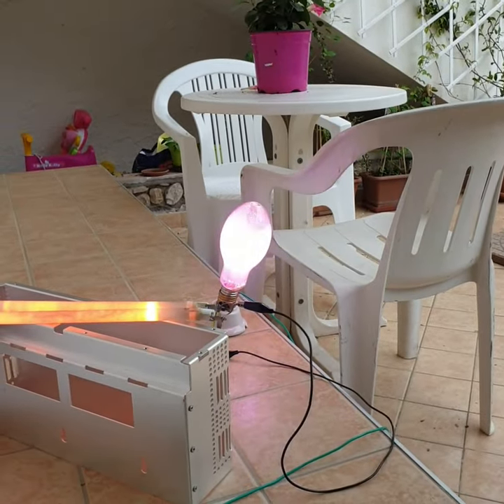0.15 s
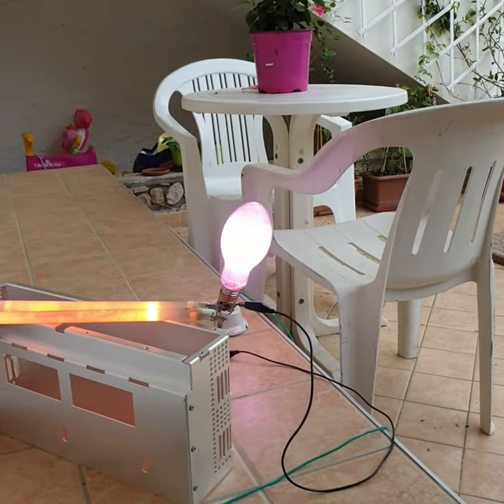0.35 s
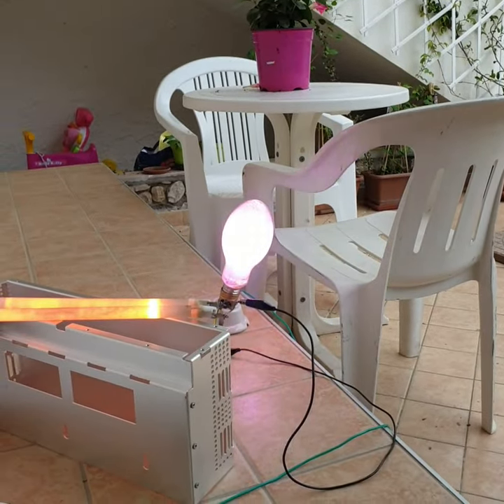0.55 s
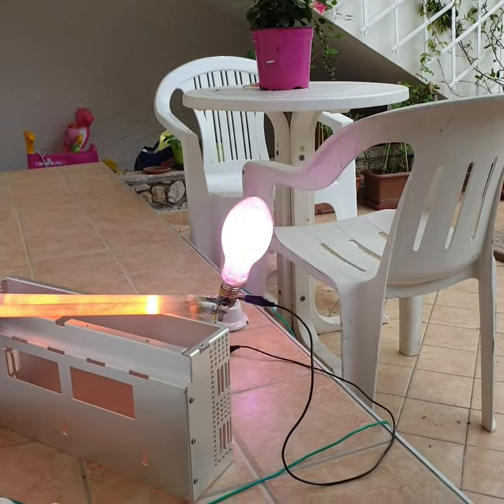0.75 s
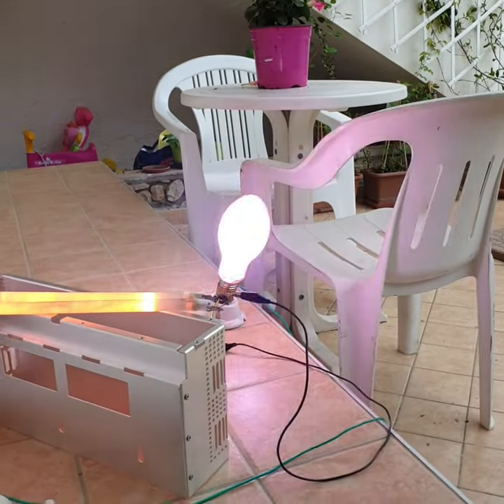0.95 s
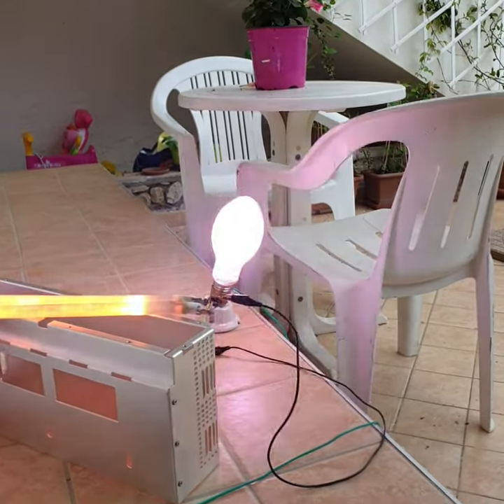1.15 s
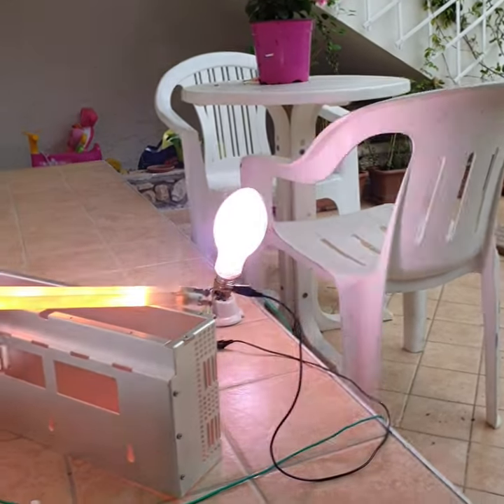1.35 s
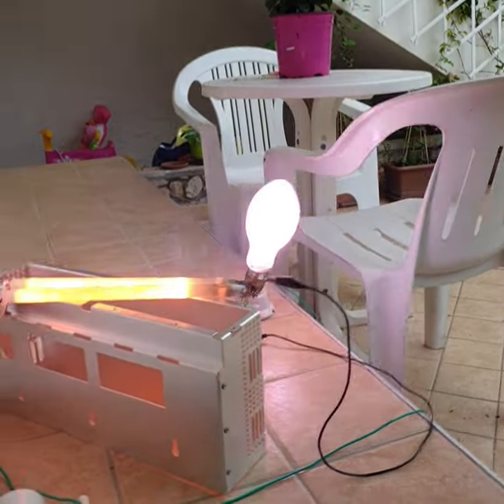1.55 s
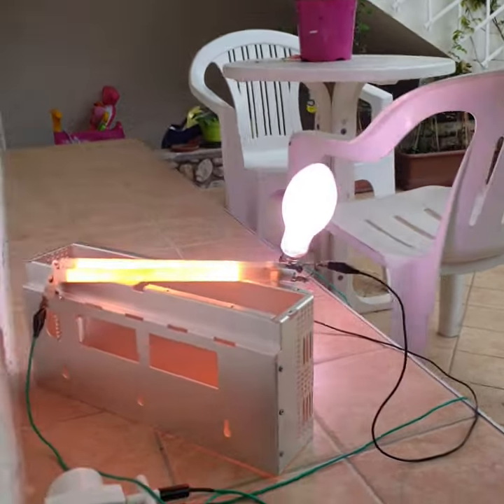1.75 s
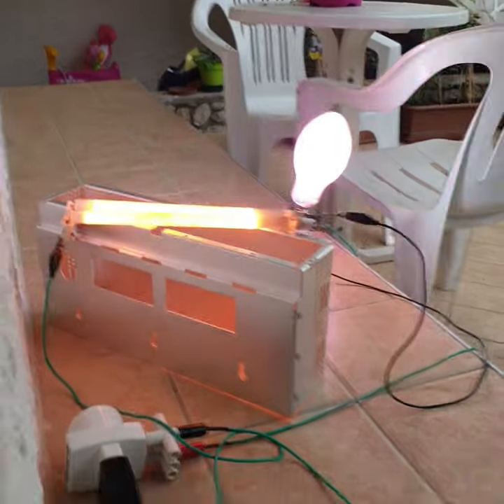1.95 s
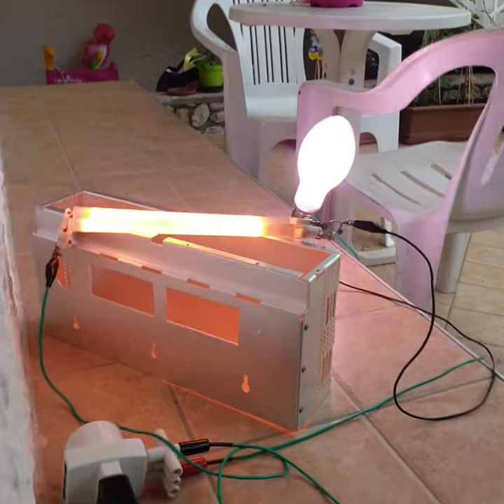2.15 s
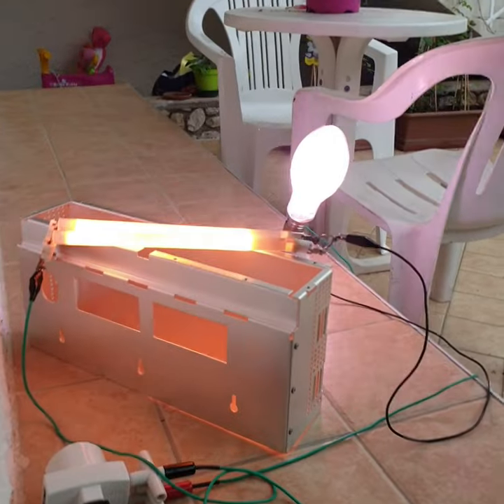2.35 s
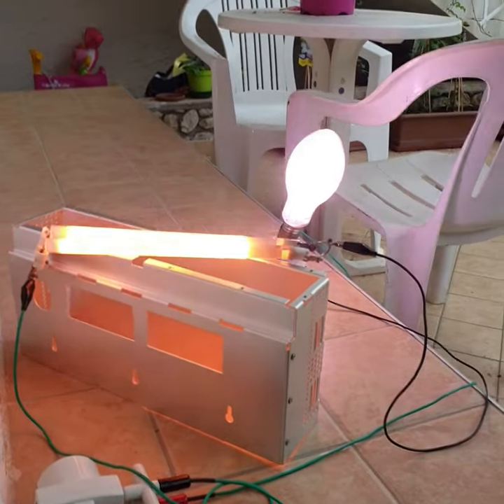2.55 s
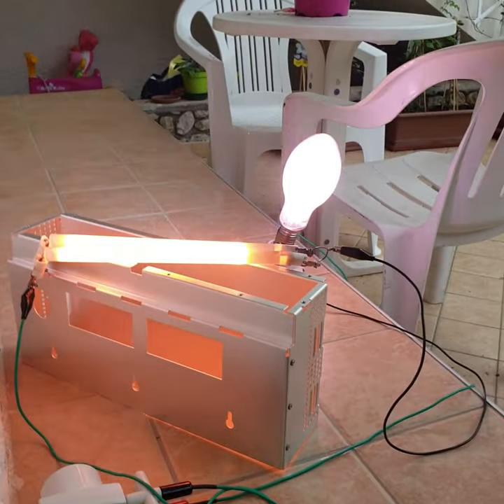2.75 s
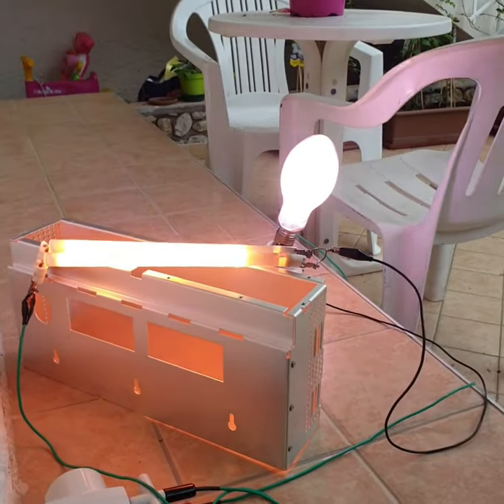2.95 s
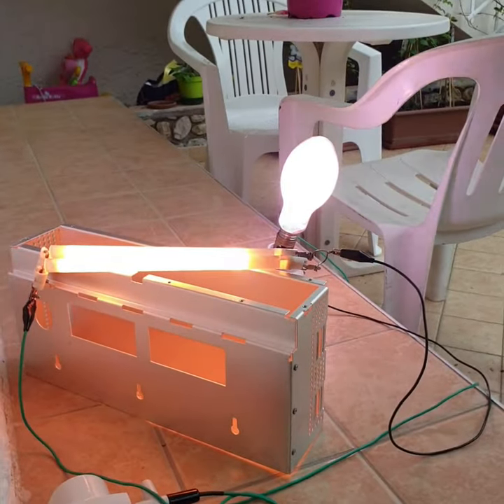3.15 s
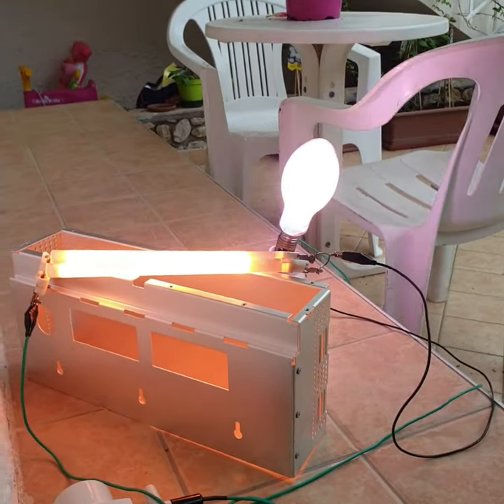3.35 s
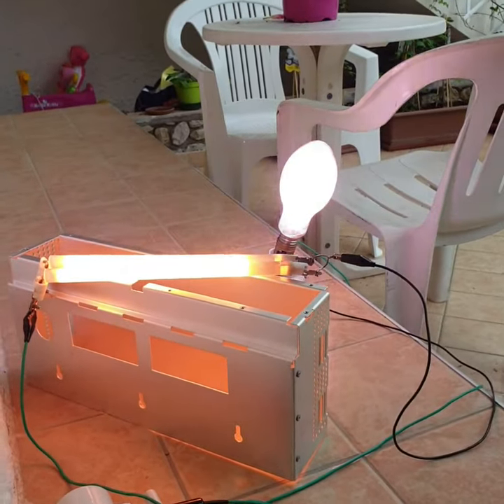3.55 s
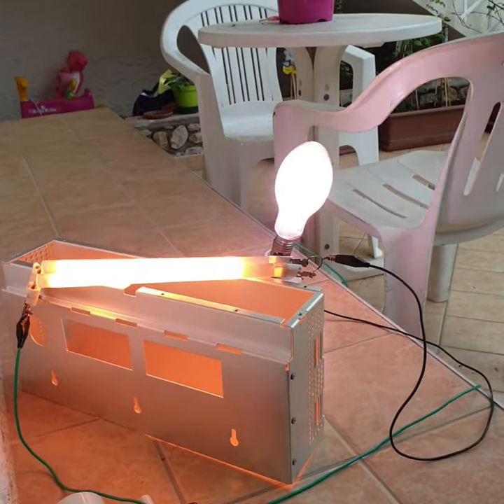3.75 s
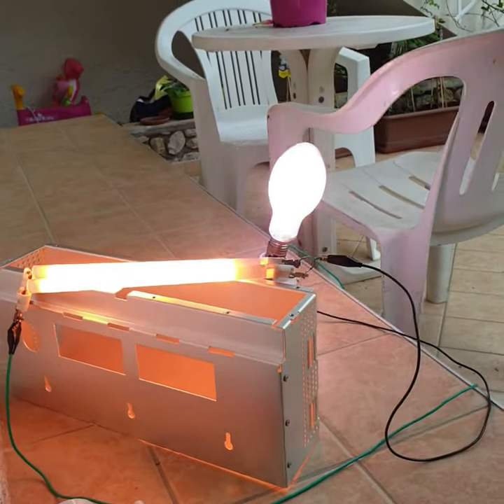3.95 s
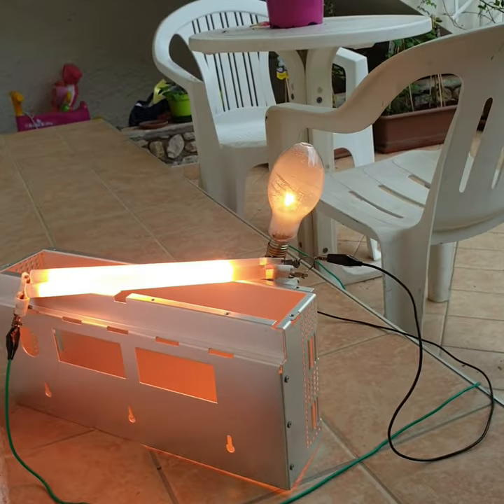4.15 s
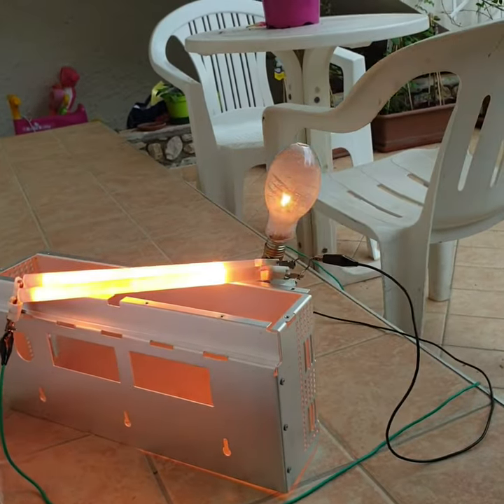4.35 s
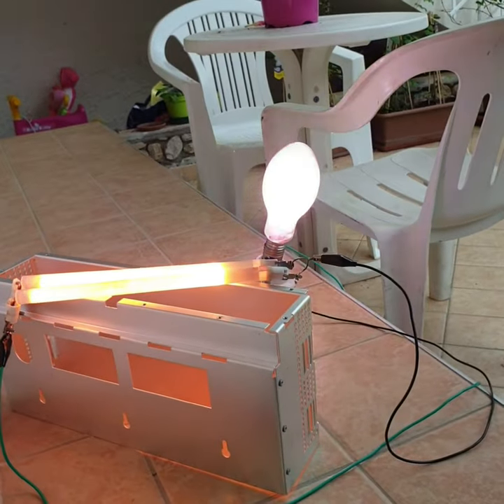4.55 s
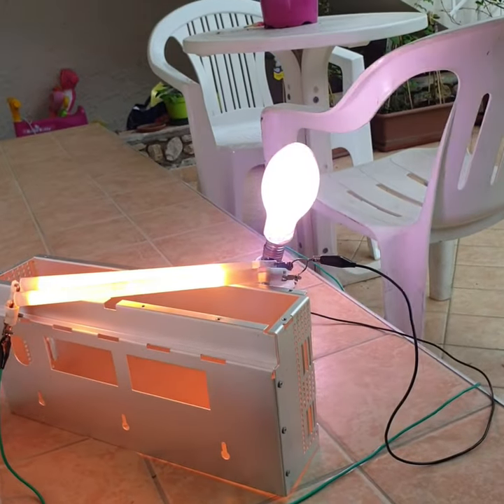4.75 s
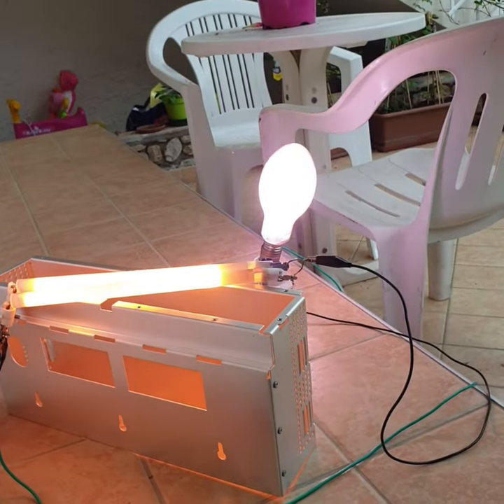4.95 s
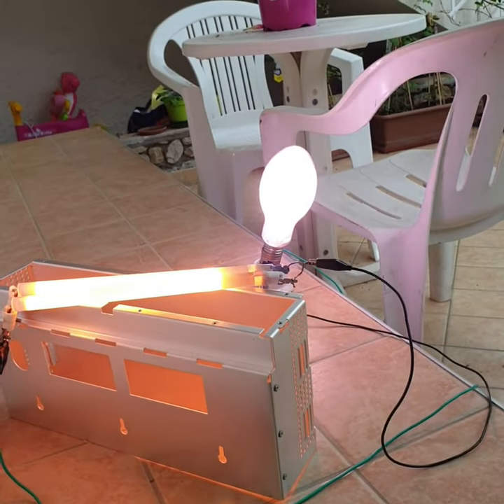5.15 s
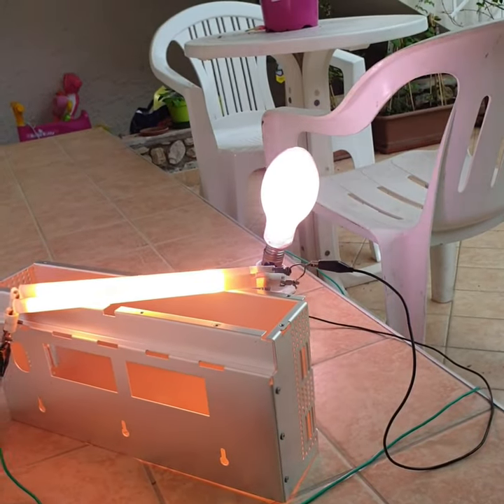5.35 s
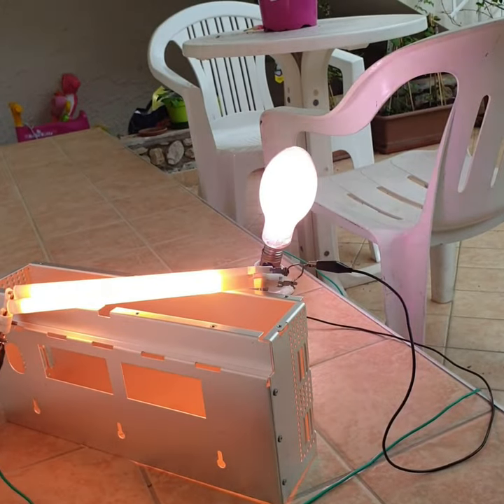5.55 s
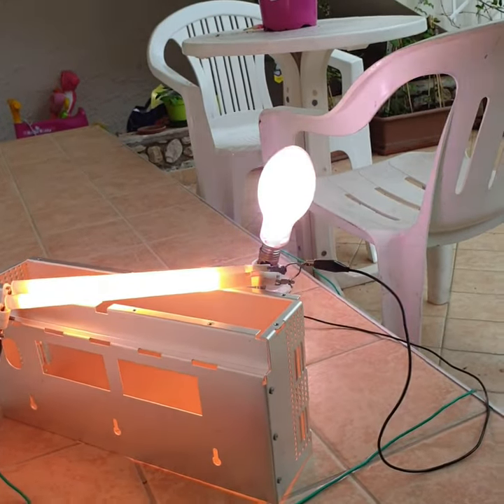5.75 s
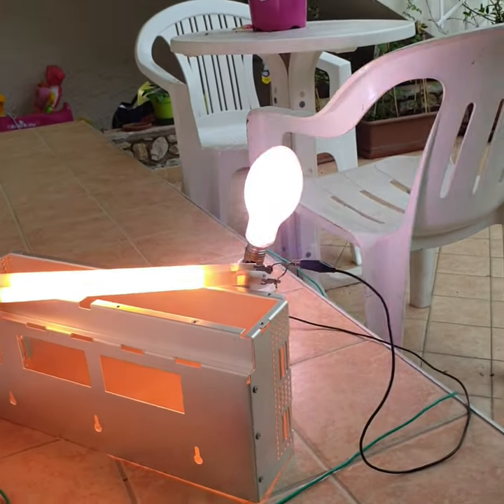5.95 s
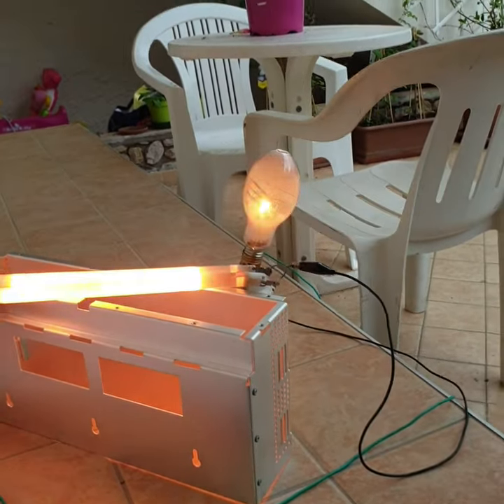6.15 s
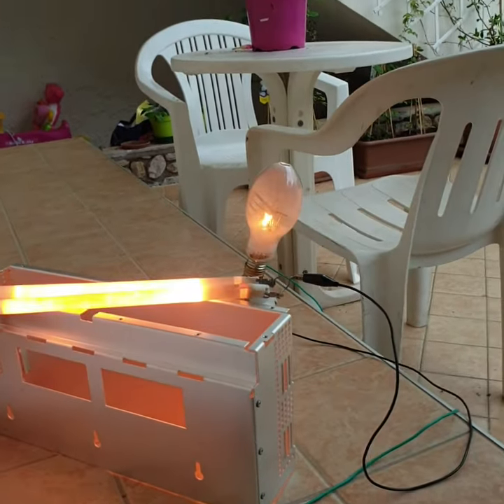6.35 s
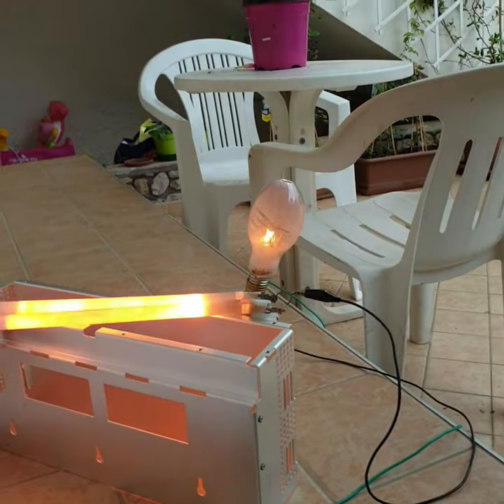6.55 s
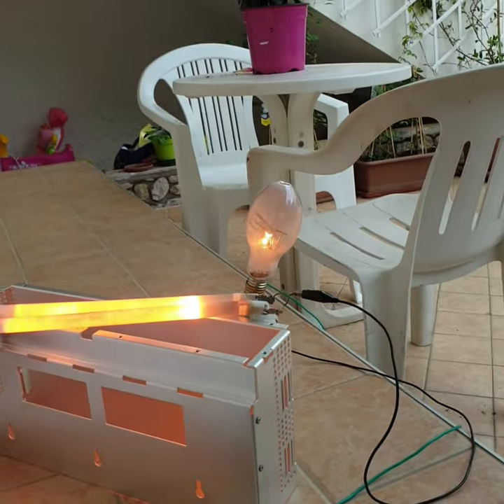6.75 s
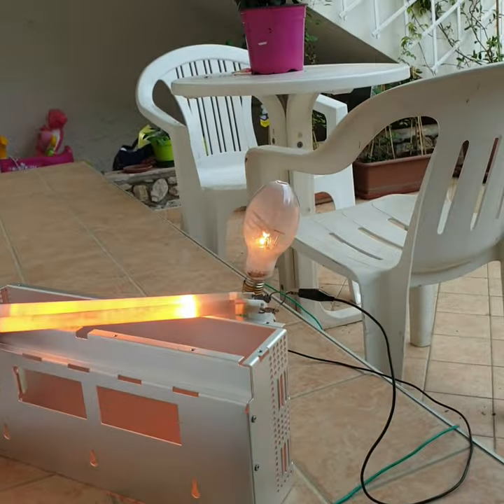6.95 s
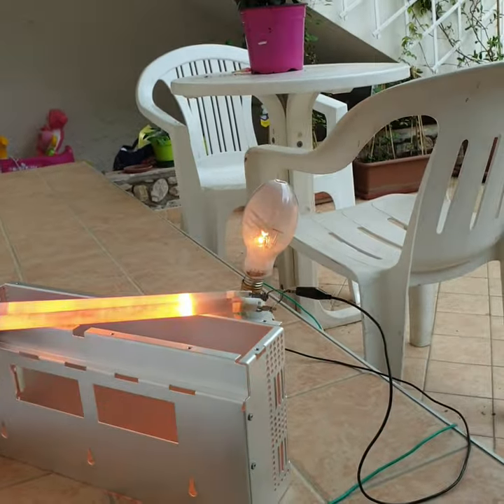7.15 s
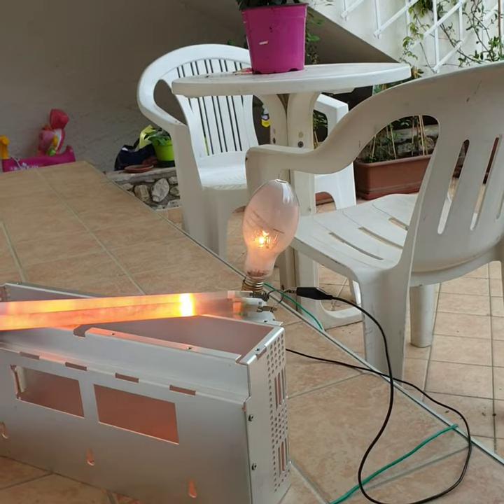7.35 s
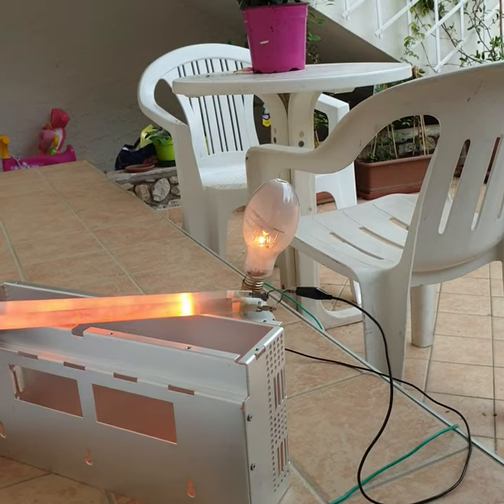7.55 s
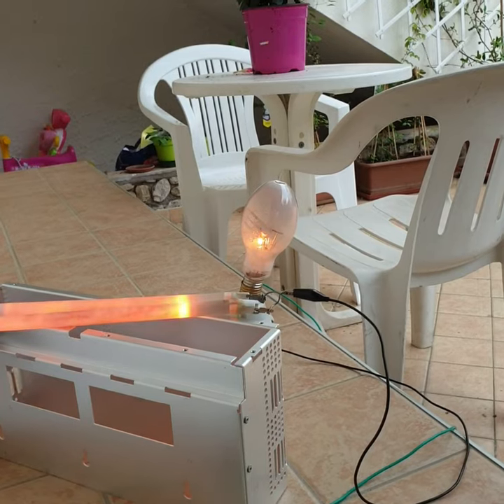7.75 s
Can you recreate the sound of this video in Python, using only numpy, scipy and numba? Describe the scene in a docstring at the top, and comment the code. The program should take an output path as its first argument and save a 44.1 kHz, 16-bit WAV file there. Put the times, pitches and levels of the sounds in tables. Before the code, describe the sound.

A harsh 50-hertz electrical buzz sizzles from an overdriven lamp on a tiled terrace, with an early metallic crack, dropouts, and a passing vehicle.

```python
"""An overdriven discharge lamp on a tiled terrace: its arc strikes once a mains cycle and rings the hot gas and the glass.
The buzz swells, the arc drops out, strikes again and dies; the buzz's low band comes through in short bursts of noise.
A metal part cracks and rattles: clicks start decaying modes. Shoes scuff near the microphone: swells of gliding noise.
A small motor hums and a drone creeps up, both sines; an engine gathers speed in the street as a stack of
wavering orders, over filtered noise for rumble, distant traffic and tyres."""
import sys
import numpy as np
from scipy import signal
from scipy.fft import rfft, irfft, next_fast_len
from scipy.io import wavfile
from scipy.ndimage import uniform_filter1d
from numba import njit

SR = 44100
rng = np.random.default_rng(int(sys.argv[2]) if len(sys.argv) > 2 else 0)


def file_out(sig):
    """Save sig as 16-bit WAV at sys.argv[1]."""
    # one column per channel
    cols = np.atleast_2d(sig).T
    # limit, then scale
    lim = np.clip(cols, -1, 1)
    pcm = np.round(lim * 32767).astype(np.int16)
    wavfile.write(sys.argv[1], SR, pcm)


N = 344421
TIME = np.arange(N) / SR
MAINS_HZ = 50

# Stages of the arc. Each row: on in s, off in s, strike moment within the mains cycle in s,
# burst length to 1/e^2 of its amplitude in s, snap in dB, first sizzle in dB, settled sizzle in dB,
# settling time in s, settled lower ring in dB. Levels precede the gains in lamp() and strikes().
ARC_STAGES = [(0, 0.936, 0.013, 0.02, 5, -59.5, -57, 0.38, -59),
              (0.943, 2.308, 0.0006, 0.01, 19.5, -49.5, -54, 3.4, -54.5),
              (2.322, 4.141, 0.0006, 0.005, 19, -51, -38.5, 1.31, -45.5),
              (4.558, 6.142, 0.001, 0.0038, 17.5, -49.5, -40.5, 0.26, -46)]
# Gas warming per stage; heat is the speed of sound as a share of that at full heat.
# Each row: first heat (ratio), final heat (ratio), time constant in s, delay in s.
GAS_WARMING = [(.84, .848, .5, 0), (.856, .98, .34, .05), (.977, .988, .8, 0), (.78, 1.003, .112, 0)]
# Flares and sags of the arc, for one strike or several.
# Each row: centre in s, half length in s, extra sizzle in dB, extra lower ring in dB.
ARC_FLARES = [(0.942, 0.0077, 9.5, 11.5), (0.995, 0.015, -7, -17), (1.055, 0.019, 8, 10),
              (1.11, 0.007, 13.5, -6), (1.164, 0.0062, 5.5, -9), (1.231, 0.018, 12.5, 4),
              (1.305, 0.0044, 9, 5), (1.328, 0.0055, 4.5, 12), (1.41, 0.033, 2, 7), (1.5, 0.009, 1.5, 1),
              (2.336, 0.036, -4, -3), (2.864, 0.0049, -4.5, -3), (3.377, 0.035, 0, 1),
              (3.74, 0.15, 1.5, 1.5), (3.863, 0.0041, 3.5, 1), (4.087, 0.098, -5, -6.5),
              (4.687, 0.059, 2.5, 12.5), (4.78, 0.024, 0.5, 5.5), (5.34, 0.038, 0.5, -2),
              (5.635, 0.095, 3, 2.5), (5.763, 0.0046, 5, 5), (5.83, 0.14, -2.5, -5.5),
              (5.861, 0.0068, 4.5, 9), (6.101, 0.0044, 6, -2)]
# Gas column at full heat. Each row: centre in Hz, width in Hz, gain over the bare arc in dB.
GAS_MODES = [(5574, 76, 16), (8332, 94, 14.5), (10850, 110, 9), (11710, 135, 9.5), (15400, 180, 10)]
# Bulb and holder. Each row: centre in Hz, width in Hz, gain in dB.
GLASS_MODES = [(4500, 430, -23), (5660, 510, -17.5), (6290, 320, -14), (6640, 190, -12), (7770, 85, 3),
               (8257, 85, -12.5), (10020, 49, -7), (10740, 1100, -25.5), (11210, 88, -14.5),
               (12840, 119, 11), (12840, 235, -4), (13300, 100, -5), (14050, 195, 3)]
# Lamp's side as the phone is carried round it. Each row: time in s, left minus right in dB before each band's share.
LAMP_BEARING = [(0.3, -3.5), (1.0, -10.5), (1.7, -1.5), (2.5, 18.5), (3.8, 18.5), (6.1, 18)]
# Echo of the terrace. Each row: frequency in Hz, t60 in s.
TERRACE_T60 = [(300, 0.25), (1500, 0.51), (4000, 0.31), (8000, 0.37), (14000, 0.22)]
# Small motor's level as the phone moves about. Each row: time in s, mean level in dB rms.
MOTOR_LEVEL = [(0, -58.5), (0.6, -57), (1.6, -59.5), (2.3, -54.5), (3.2, -53), (5, -54), (7.8, -55.5)]
# Relative spectra of the street's noises. Each row: frequency in Hz, gain in dB.
RUMBLE_SPECTRUM = [(20, -12), (32, -23.5), (42, 0.5), (55, 5.5), (75, 4), (110, -0.5), (160, -8.5),
                   (260, -27), (600, -80.5)]
TRAFFIC_SPECTRUM = [(60, 4.5), (130, 5), (290, 5.5), (400, -1), (600, -3), (850, -5), (1200, -16),
                    (2500, -33), (4500, -27), (7500, -33), (9000, -42), (13000, -34)]  # with the faint hiss of the air
TYRE_SPECTRUM = [(300, 2.5), (700, 9.5), (1050, 7.5), (1700, 4.5), (2500, -9), (4000, -67), (7000, -26),
                 (10000, -51), (15000, -24.5)]
HISS_SPECTRUM = [(500, -25.5), (1500, 1.5), (2800, 9), (4200, 3), (7500, -10.5), (8500, -41)]  # tyre treble
# Scuffs, swishes and low scraping. Each row: peak in s, rise in s, fall in s, level in dB, centre in Hz,
# width of each of two filter passes in Hz, glide in octaves per s, left minus right in dB.
SCUFF_STROKES = [(0.379, 0.29, 1, -72, 3160, 900, 1, -1.5),
                 (0.502, 0.095, 0.34, -64, 1660, 200, -0.5, -4.5),
                 (1.665, 0.0021, .005, -50.5, 2040, 1170, -3, -4),
                 (1.681, 0.0016, 0.0065, -48.5, 2080, 1180, -21, -1),
                 (2.008, 0.034, 0.025, -36.5, 4130, 5400, -10, 0),
                 (2.006, 0.055, 0.044, -40, 12400, 7040, -5, 2),
                 (2.177, 0.0096, 0.022, -39, 7400, 12000, -12, -2),
                 (2.174, 0.0051, 0.0098, -42, 420, 380, -10, 1),
                 (3.441, 0.015, 0.018, -47.5, 4850, 900, -3, 7),
                 (3.47, 0.02, 0.018, -43, 3940, 900, -10, 4.5),
                 (3.51, 0.026, .02, -47.5, 3100, 700, -2, -0.5),
                 (3.52, 0.057, .12, -54.5, 4000, 2000, -0.5, 2),
                 (3.565, 0.021, 0.019, -48, 3240, 400, -1.5, -1),
                 (3.64, 0.045, 0.071, -58.5, 3150, 650, 2.5, -2.5),
                 (3.744, 0.045, 0.025, -62.5, 3280, 500, 1.8, -5.5),
                 (3.548, 0.0055, 0.0055, -57.5, 1530, 600, 5, -6),
                 (3.67, 0.011, 0.027, -63, 1600, 300, 3, -3),
                 (4.511, 0.076, 0.23, -72.5, 3500, 694, 1, -4.5),
                 (3.56, 0.055, 0.083, -58.5, 530, 90, 0, 7.5),
                 (3.702, 0.061, 0.059, -54.5, 438, 39.9, 0.5, -1),
                 (3.879, 0.039, 0.11, -55.5, 351, 35, 3, 4)]
# Modes of the snapping metal part. Each row: frequency in Hz, level in dB before the blow's tilt, t60 in s.
METAL_MODES = [(1560, -27, 0.21), (1858, -25, 0.24), (1880, -8, 0.08), (2010, -28, 0.12),
               (3300, -25.5, 0.15), (4690, -20, .1), (7715, -8, 0.11), (7790, -10, 0.15), (7600, -4, .03),
               (10130, -18, 0.2), (11480, -11, .05), (12950, -13, 0.08), (13740, -6, 0.055),
               (14080, -18, 0.15)]
# Blows on it. Each row: start in s, crack in dB, ring in dB, brightness of the ring in dB per octave,
# damping of the earlier ring in dB (negative lifts it), click centre in Hz, left minus right in dB.
METAL_BLOWS = [(0.5444, -10, -11.5, 1, 0, 3770, -6.5), (0.5634, -24, -30, 3, -6, 11500, 7),
               (0.5742, -8.5, -21, -1, 11, 13100, 7), (0.5982, -19.5, -28, 8, -3, 3770, 7.5),
               (0.605, -18, -21.5, 3.5, -2.5, 3480, 4), (0.6575, -25.5, -37, -.5, 6, 4500, 4),
               (0.6792, -31, -48, -5, 7, 4930, 4)]
# Relative spectrum of the crack. Each row: frequency in Hz, gain in dB.
CRACK_SPECTRUM = [(300, -22.5), (900, -13), (1500, 1.5), (3300, -8), (5500, 7), (9000, 10), (13000, 5.5),
                  (15500, -17.5)]
# Vehicle's speed. Each row: time in s, mean firing rate in Hz.
ENGINE_RATE = [(1.3, 48), (2.1, 51.82), (3.1, 64.46), (3.85, 70.3), (4.45, 79.54), (5, 95), (5.75, 105.7),
               (6.5, 105.6), (6.9, 112.5), (7.33, 118), (7.8, 122.8)]
# Higher engine orders. Each row: multiple of the firing rate (ratio), mean level re the second order in dB.
HIGHER_ORDERS = [(3, -7.5), (4, -11), (5, -10.5), (6, -11)]
# Engine whine. Each row: multiple of the firing rate (ratio), mean level re the tyre hiss in dB.
WHINE_ORDERS = [(7, -2.5), (8, -7), (9, -6.5), (10, -3.5), (11, -6.5), (12, -9), (13, -8.5), (14, -8.5),
                (15, -4.5), (16, -10)]
# Echoes between the houses make an order boom.
# Each row: centre in s, half length in s, multiple of the firing rate (ratio), extra level in dB.
ORDER_BOOMS = [(1.448, 0.15, 1, 6), (2.2, 0.26, 1, 7.5), (3.042, 0.4, 1, 6.5), (3.741, 0.44, 1, 9),
               (3.806, 0.33, 2, 9.5), (4.395, 0.046, 1, 12.5), (4.569, 0.093, 2, 14.5), (5.136, 0.23, 1, 7),
               (6.013, 0.3, 2, 6.5), (6.699, 0.14, 2, 8), (6.996, 0.12, 1, 11), (7.707, 0.57, 1, 12),
               (6.88, 0.13, 15, 16), (7.032, 0.14, 9, 16.5), (7.148, 0.1, 14, 12), (7.325, 0.062, 9, 7.5),
               (7.704, .12, 12, 19)]
# Spells of the buzz's low band; silent where off precedes on.
# Each row: on in s, off in s, level in dB before flicker, centre in Hz, width of each of two filter passes in Hz.
LOW_BUZZ_SPELLS = [(4.563, 4.61, -54.5, 5900, 900), (4.95, 5.05, -75, 3580, 596),
                   (5.538, 5.783, -65, 3520, 197), (5.58, 5.65, -64.5, 1610, 178),
                   (5.59, 5.74, -61, 4320, 500), (5.764, 5.762, -52.5, 3650, 700),
                   (5.859, 5.912, -63, 3660, 550), (6.097, 6.105, -62.5, 3700, 350),
                   (6.1, 6.11, -62, 2720, 300)]

# lamp
RING_FOLLOW = 0.69  # dB of lower ring per dB of sizzle
TURBULENCE = 0.005  # heat ripple of the coldest gas
STRIKE_SCATTER_DB, WEAK_SCATTER_DB = 1, 1  # strike to strike; extra while the arc is weak
FULL_POWER_DB, POWER_RANGE_DB = -34.5, 9.5  # sizzle at full power; span down to a weak arc
LOUD_MODE_HZ, LOUD_MODE_WIDTH_HZ, WEAK_LOSS = 12950, 330, 0.74  # share of this band lost by a weak arc
WARM_HEAT, COLD_SPAN = 0.87, 0.036  # below this heat the lower ring and the buzz fade, over this span
COLD_RING_DB, COLD_BUZZ_DB = -8, -7
SOCKET_HZ, SOCKET_WIDTH_HZ, SOCKET_DB = 4712, 90, -18.5  # level re the lower ring
SWELL_HZ, SWELL_WIDTH_HZ, SWELL_DB = 4820, 200, 12  # socket swells as the lowest gas mode passes here
# hum
MOTOR_HZ = 487.7
DRONE_HZ, DRONE_DB, DRONE_RISE_HZ_PER_S = 173.9, -57.5, 3.3
DRONE_ON_S, DRONE_OFF_S, DRONE_FADE_S = 0.98, 4.66, 0.63
# street; PASSING_S is the time to drive the closest distance, IN_VIEW_S the half length of clear treble
CLOSEST_S, PASSING_S, IN_VIEW_S = 7.38, 0.87, 0.41
TYRE_DB, RUMBLE_DB, TRAFFIC_DB, HISS_DB = -52.5, -49, -56, -61.5  # tyres and hiss at the closest
ENGINE_ON_S, ENGINE_RISE_S = 0.76, 0.35
FIRST_DB, SECOND_DB = -53, -60  # mean levels of the two lowest orders
TOP_HZ = 14450


def undb(db):
    """Decibels to gain."""
    return 10 ** (np.asarray(db) / 20)


def unit(x):
    """Scale to rms 1."""
    return x / np.sqrt(np.mean(x ** 2) + 1e-20)


def curves(rows):
    """Each column of a table, after its times, as a signal."""
    times_s, *columns = np.transpose(rows)
    return [np.interp(TIME, times_s, column) for column in columns]


def at_hz(points, hz):
    """Read (Hz, value) points on a log-frequency axis."""
    points_hz, values = np.transpose(points)
    return np.interp(np.log(hz + 1), np.log(points_hz), values)


def wander(rate_hz):
    """Slow chance: random knots joined by lines, spread near 1."""
    knots = rng.standard_normal(400)
    return np.interp(TIME * rate_hz, np.arange(len(knots)), knots)


def bump(centre_s, half_s):
    """Smooth swell of height 1 around a moment."""
    return np.exp(-((TIME - centre_s) / half_s) ** 2)


def ramp(start_s, length_s):
    """Rise from 0 to 1 from a moment; a negative length falls to 0 at it."""
    return np.clip((TIME - start_s) / length_s, 0, 1)


def pan(db):
    """Left and right gains for a level difference."""
    return undb(np.array([[.5], [-.5]]) * db)


def ports(x, lag_samples=4):
    """Sound from the lamp's side reaches the right port a few samples late."""
    late = np.concatenate([np.zeros(lag_samples), x[:-lag_samples]])
    return np.array([x, late])


def stereo_noise(likeness):
    """Two noises that share a part of their power."""
    shared = np.sqrt(likeness) * rng.standard_normal(N)
    return shared + np.sqrt(1 - likeness) * rng.standard_normal((2, N))


def colour(x, spectrum):
    """Filter by a (Hz, dB) spectrum."""
    size = x.shape[-1]
    padded = next_fast_len(size)
    gains = undb(at_hz(spectrum, np.fft.rfftfreq(padded, 1 / SR)))
    return irfft(rfft(x, padded) * gains, padded)[..., :size]


def band(x, low_hz, high_hz, order=4):
    """Keep one band."""
    sos = signal.butter(order, [low_hz, high_hz], "band", fs=SR, output="sos")
    return signal.sosfilt(sos, x)


@njit
def svf(x, g, k):
    """State-variable band-pass whose centre may move."""
    y, b, l = np.empty(len(x)), 0., 0.
    for i in range(len(x)):
        v = (b + g[i] * (x[i] + 1e-18 - l)) / (1 + g[i] * (g[i] + k[i]))
        b, l, y[i] = 2 * v - b, l + 2 * g[i] * v, k[i] * v
    return y


def resonance(x, hz, width_hz):
    """One resonance of a given centre and width, peak gain 1."""
    angle = np.pi * np.minimum(hz, .45 * SR) / SR
    damping = 2 * np.pi * width_hz / SR / np.sin(2 * angle)
    ones = np.ones(len(x))
    return svf(x, np.tan(angle) * ones, damping * ones)


def terrace(x):
    """Diffuse echo of walls and tiles: noise whose t60 depends on frequency."""
    t = TIME[:SR // 2]
    hz, s, cells = signal.stft(rng.standard_normal((2, len(t))), SR, nperseg=128)
    decay_db = -60 * s / at_hz(TERRACE_T60, hz)[:, None]
    tail = signal.istft(cells * undb(decay_db), SR)[1][:, :len(t)]
    tail = tail * (1 - np.exp(-t / .002)) * (1 + 1.5 * np.exp(-t / .007))  # soft onset, strong early part
    return signal.fftconvolve(x[None], unit(tail) / np.sqrt(len(t)), axes=1)[:, :N]


def weakness(sizzle_db):
    """0 at full power, 1 while the arc is weak."""
    return np.clip((FULL_POWER_DB - sizzle_db) / POWER_RANGE_DB, 0, 1)


def arc_state():
    """In each stage the gas warms and the arc settles to a new level; it flickers and flares on top."""
    heat, sizzle_db, ring_db = np.zeros((3, N))
    for stage, (cold, hot, warm_s, delay_s) in zip(ARC_STAGES, GAS_WARMING):
        on_s, _, _, _, _, first_db, last_db, settle_s, lower_db = stage
        live = TIME >= on_s
        unsettled_db = (first_db - last_db) * (1 - ramp(on_s, settle_s)[live])
        heat[live] = hot + (cold - hot) * np.exp(np.minimum(on_s + delay_s - TIME[live], 0) / warm_s)
        sizzle_db[live] = last_db + unsettled_db
        ring_db[live] = lower_db + RING_FOLLOW * unsettled_db
    coldness = (heat.max() - heat) / np.ptp(heat)
    heat = heat * (1 + TURBULENCE * coldness * wander(MAINS_HZ))
    flicker_db = (STRIKE_SCATTER_DB + WEAK_SCATTER_DB * weakness(sizzle_db)) * wander(MAINS_HZ)
    buzz_db = ring_db + RING_FOLLOW * flicker_db  # the buzz takes no flares
    for centre_s, half_s, high_db, low_db in ARC_FLARES:
        sizzle_db += high_db * bump(centre_s, half_s)
        ring_db += low_db * bump(centre_s, half_s)
    return np.maximum(heat, .5), sizzle_db + flicker_db, ring_db + RING_FOLLOW * flicker_db, buzz_db


def strikes(back_db, glow_db, fresh, snap_db=0, snap_lag_s=.0013, rise_s=.0006, slip_s=.00002):
    """Each mains cycle a drifting snap in a short burst, a weaker burst half a cycle on, and steady fizz between."""
    size = SR // MAINS_HZ
    cycles = N // size + 1
    # the grain changes slowly from cycle to cycle and slips in time
    pattern = unit(uniform_filter1d(rng.standard_normal((cycles, size)), axis=0, size=13))
    shifts = np.round(np.cumsum(rng.standard_normal(cycles)) * slip_s * SR).astype(int)
    pattern = np.array([np.roll(p, k) for p, k in zip(pattern, shifts)])
    grain = pattern + fresh * rng.standard_normal((cycles, size))
    gate, snaps = np.zeros((2, N))
    for on_s, off_s, moment_s, burst_s, strike_db, *_ in ARC_STAGES:
        live = (TIME >= on_s) & (TIME < off_s)
        gate[live] += undb(glow_db)
        for lag_s, db in ((0, 0), (.5 / MAINS_HZ, back_db)):
            age_s = (TIME[live] - moment_s - lag_s) % (1 / MAINS_HZ)
            attack = 1 - np.exp(-(age_s / rise_s) ** 2)
            gate[live] += undb(db) * attack * np.exp(-2 * age_s / burst_s)
        at = np.arange(cycles) * size + shifts + int((moment_s + snap_lag_s) * SR)
        snaps[at[(at >= on_s * SR) & (at < off_s * SR)]] = undb(strike_db + snap_db)
    return grain.ravel()[:N] * gate + snaps


def bulb(arc, heat):
    """The arc rings the gas column, whose modes climb as it heats, and passes out through the glass."""
    gas = arc + sum(undb(db) * resonance(arc, hz * heat, width_hz) for hz, width_hz, db in GAS_MODES)
    glass = 0
    for k, (hz, width_hz, db) in enumerate(GLASS_MODES):
        glass = glass + (-1) ** k * undb(db) * resonance(gas, hz, width_hz)  # alternating polarity
    return glass


def steady(x):
    """Even out the level over a few mains cycles."""
    size = SR // MAINS_HZ
    power = uniform_filter1d(uniform_filter1d(x ** 2, size), 2 * size)
    return x / np.sqrt(np.abs(power) + 0.024 * np.mean(x ** 2))


def lamp(sizzle_db=2, ring_db=-2.0, buzz_db=-3,
         room_db=0.5, ring_room_db=-7.5, buzz_room_db=-8, socket_room_db=-6):
    """Sizzle and ring once a mains cycle, over a denser, lower buzz and socket tone fed by both half-cycles."""
    heat, level_db, lower_db, base_db = arc_state()
    pan_db, = curves(LAMP_BEARING)
    cold = np.clip((WARM_HEAT - heat) / COLD_SPAN, 0, 1)
    arc = strikes(back_db=-24, glow_db=-30, fresh=.45)
    even = strikes(back_db=-9, glow_db=-18, fresh=.7, snap_db=-4)
    glass = bulb(arc, heat)
    loud_mode = resonance(glass, LOUD_MODE_HZ, LOUD_MODE_WIDTH_HZ)
    top = glass - WEAK_LOSS * weakness(level_db) * loud_mode

    sizzle = undb(level_db) * steady(band(top, 9500, 15000))
    ring = undb(lower_db + COLD_RING_DB * cold) * steady(band(glass, 7420, 8940))
    buzz = undb(base_db + COLD_BUZZ_DB * cold) * steady(band(bulb(even, heat), 4200, 6580))
    swell = np.exp(-((GAS_MODES[0][0] * heat - SWELL_HZ) / SWELL_WIDTH_HZ) ** 2)
    thin = resonance(resonance(even, SOCKET_HZ, SOCKET_WIDTH_HZ), SOCKET_HZ, SOCKET_WIDTH_HZ)
    socket = undb(lower_db + SOCKET_DB + SWELL_DB * swell) * steady(thin)

    # the phone's body shades the far port most in the top octave
    direct = undb(sizzle_db) * ports(sizzle) * pan(0.67 * pan_db)
    direct += undb(ring_db) * ports(ring) * pan(0.54 * pan_db)
    direct += (undb(buzz_db) * ports(buzz) + ports(socket, lag_samples=2)) * pan(0.41 * pan_db)
    sent = undb(room_db) * sizzle + undb(ring_room_db) * ring
    sent += undb(buzz_room_db) * buzz + undb(socket_room_db) * socket
    return direct + terrace(sent)


def hum():
    """A small motor holds one tone; a lower drone comes, creeps up in pitch and goes."""
    port_phase = np.array([[0], [1.0]])  # rad
    tone = np.sin(2 * np.pi * MOTOR_HZ * TIME + port_phase + 0.055 * wander(3.07))
    tone = tone * undb(curves(MOTOR_LEVEL)[0] + .7 * wander(3))
    hz = DRONE_HZ + DRONE_RISE_HZ_PER_S * (TIME - DRONE_ON_S)
    swell = ramp(DRONE_ON_S, DRONE_FADE_S) * ramp(DRONE_OFF_S, -DRONE_FADE_S)
    drone = np.sin(2 * np.pi * np.cumsum(hz) / SR + 0.88 * wander(6))
    drone = drone * undb(DRONE_DB + 1.06 * wander(1.4)) * swell
    return np.sqrt(2) * (tone * pan(1.0) + drone)


def hiss_level():
    """Tyre hiss in dB, swelling as the vehicle comes into view."""
    return HISS_DB - 20 * np.log10(1 + ((TIME - CLOSEST_S) / IN_VIEW_S) ** 2)


def street():
    """Filtered noises: low rumble, distant traffic, and tyres that grow louder as their distance shrinks."""
    distance = np.hypot(1, (TIME - CLOSEST_S) / PASSING_S)  # re the closest
    rumble = unit(colour(stereo_noise(1.0), RUMBLE_SPECTRUM)) * undb(RUMBLE_DB + 2.3 * wander(17)) * pan(2.2)
    traffic = unit(colour(stereo_noise(0.74), TRAFFIC_SPECTRUM))
    traffic = traffic * undb(TRAFFIC_DB + 1.5 * wander(15)) * pan(1.3)
    tyres = unit(colour(stereo_noise(0.037), TYRE_SPECTRUM)) * undb(TYRE_DB + 1.8 * wander(1.0)) / distance
    hiss = unit(colour(stereo_noise(0.11), HISS_SPECTRUM)) * undb(hiss_level())
    return rumble + traffic + tyres + hiss


def scuffs(grit_db=4.0, room_db=-6):
    """Soles and sleeves slide over gritty surfaces: swells of fine, uneven grains whose pitch glides."""
    out = np.zeros((2, N))
    t = TIME[:SR] - .5
    for peak_s, rise_s, fall_s, db, hz, width_hz, glide, pan_db in SCUFF_STROKES:
        centre_hz = hz * 2 ** (glide * np.clip(t, -.1, .1))
        uneven_db = grit_db * np.repeat(rng.standard_normal(SR // 90), 90)  # new level every 90 samples
        grains = rng.standard_normal((2, SR)) * undb(uneven_db)
        rub = [resonance(resonance(g, centre_hz, width_hz), centre_hz, width_hz) for g in grains]
        swell = np.exp(-(np.minimum(t, 0) / rise_s) ** 2 - np.maximum(t, 0) / fall_s)
        at = (int((peak_s - .5) * SR) + np.arange(SR)) % N
        out[:, at] += undb(db) * pan(pan_db) * swell * unit(np.array(rub))
    return out + undb(room_db) * terrace(out[0])


def crack(decay_s=0.0015, click_db=3, click_width_hz=1800, attack_s=0.00048, room_db=-5):
    """A metal part snaps and bounces: each contact clicks, changes the earlier ring's level and starts a new ring."""
    t = TIME[:SR // 2]
    out = np.zeros((2, N))
    for start_s, crack_db, ring_db, bright, _, click_hz, pan_db in METAL_BLOWS:
        ring = 0
        for (hz, db, t60_s), turn in zip(METAL_MODES, rng.random(len(METAL_MODES))):
            tilt_db = bright * np.log2(hz / 7750)
            ring = ring + undb(db + tilt_db - 60 * t / t60_s) * np.sin(2 * np.pi * (hz * t + turn))
        damped_db = sum(loss_db * (start_s + t > later_s)
                        for later_s, _, _, _, loss_db, *_ in METAL_BLOWS if later_s > start_s)
        grit = rng.standard_normal(len(t))
        click = undb(click_db) * unit(resonance(grit, click_hz, click_width_hz))
        snap = unit(unit(colour(grit, CRACK_SPECTRUM)) + click) * np.exp(-t / decay_s)
        blow = undb(ring_db - damped_db) * ring + undb(crack_db) * snap
        blow = blow * (1 - np.exp(-t / attack_s))
        start = int(start_s * SR)
        out[:, start:start + len(t)] += pan(pan_db) * ports(blow, lag_samples=2)
    return out + undb(room_db) * terrace(out[0])


def vehicle(waver_db=4.0, whine_waver_db=5.0, jitter=0.00622, smear_rad=0.087):
    """Engine orders rise with speed, the upper ones whine as it nears; echoes between houses make them waver."""
    hz, = curves(ENGINE_RATE)
    near_db = hiss_level()
    phase = 2 * np.pi * np.cumsum(hz * (1 + jitter * wander(14))) / SR
    orders = [(1, FIRST_DB), (2, SECOND_DB)] + [(k, SECOND_DB + db) for k, db in HIGHER_ORDERS]
    orders = [(k, db + waver_db * wander(7)) for k, db in orders]
    orders += [(k, near_db + db + whine_waver_db * wander(18)) for k, db in WHINE_ORDERS]
    out = 0
    for k, db in orders:
        boom_db = sum(extra_db * bump(centre_s, half_s)
                      for centre_s, half_s, multiple, extra_db in ORDER_BOOMS if multiple == k)
        port_phase = np.array([[0], [.12]]) * k  # rad
        drift = 0.51 * wander(29) + smear_rad * k * wander(45)
        out = out + undb(db + boom_db) * np.sin(k * phase + port_phase + drift)
    return np.sqrt(2) * out * ramp(ENGINE_ON_S, ENGINE_RISE_S)


def low_buzz(flicker_db=2.5, room_db=-7):
    """Low part of the buzz, in short spells: noise through a resonance at each spell's own pitch."""
    out = 0
    for on_s, off_s, db, hz, width_hz in LOW_BUZZ_SPELLS:
        noise = unit(resonance(resonance(rng.standard_normal(N), hz, width_hz), hz, width_hz))
        out = out + undb(db) * noise * ramp(on_s, 0.0019) * ramp(off_s, -.002)
    out = out * undb(flicker_db * wander(MAINS_HZ))
    return ports(out, lag_samples=2) + undb(room_db) * terrace(out)


def scene():
    """Everything heard on the terrace."""
    return lamp() + hum() + street() + scuffs() + crack() + vehicle() + low_buzz()


def record(dry):
    """The phone rounds loud peaks and cuts the top."""
    low_pass = signal.ellip(7, .2, 70, TOP_HZ, fs=SR, output="sos")
    return signal.sosfilt(low_pass, np.tanh(dry))


dry = scene()
out = record(dry)
file_out(out)
```